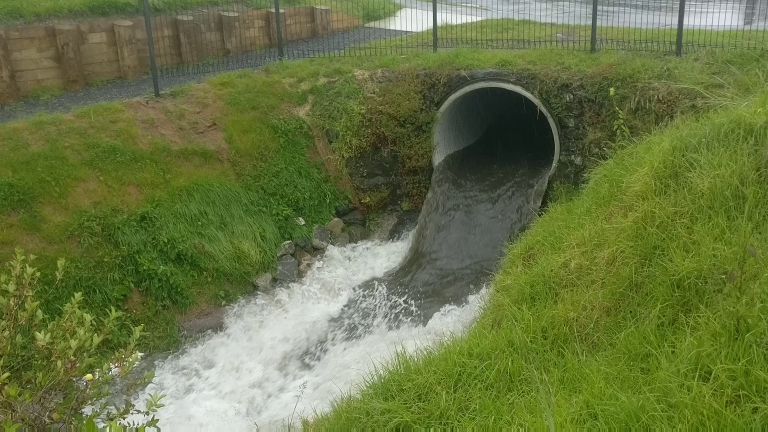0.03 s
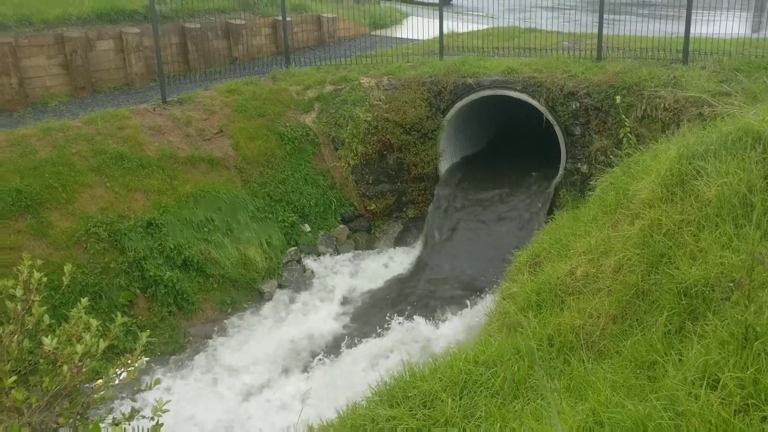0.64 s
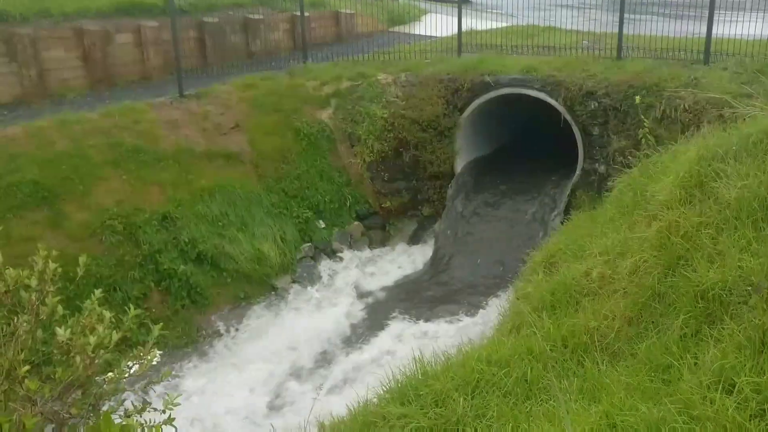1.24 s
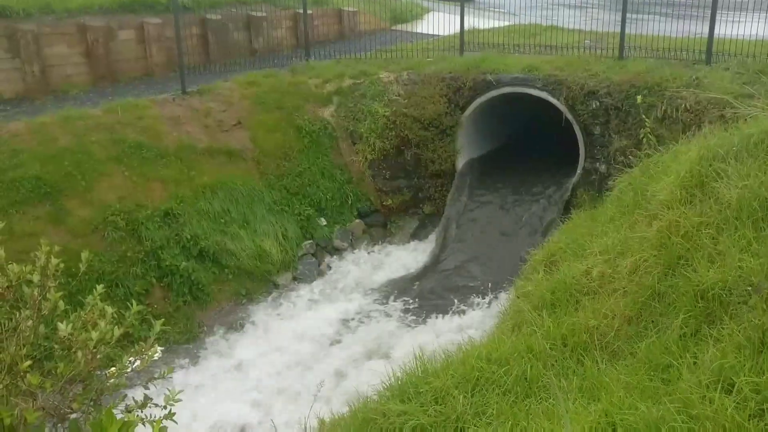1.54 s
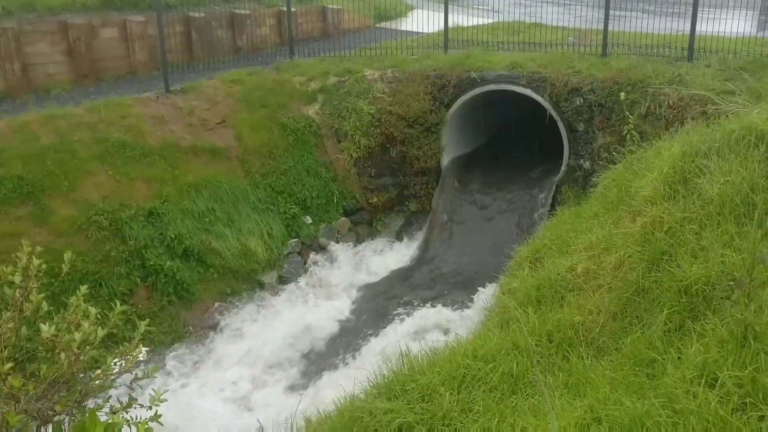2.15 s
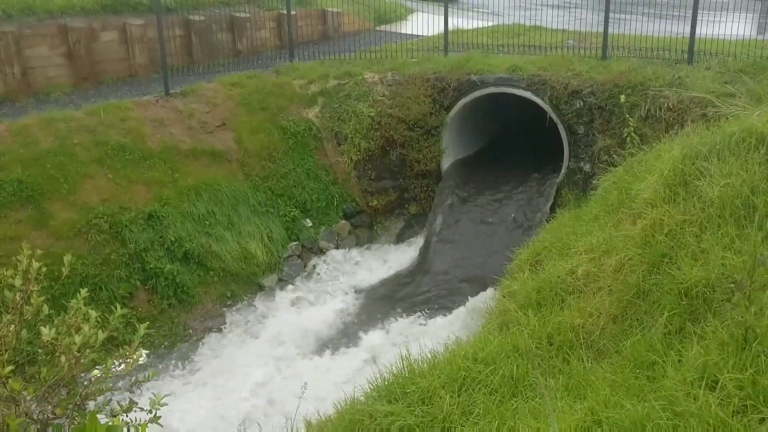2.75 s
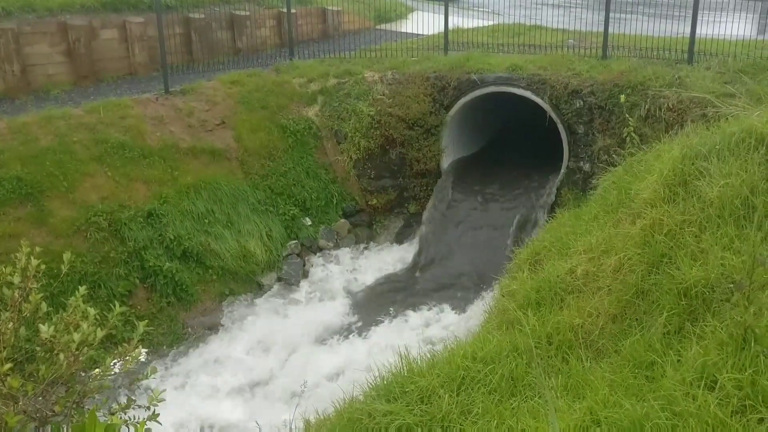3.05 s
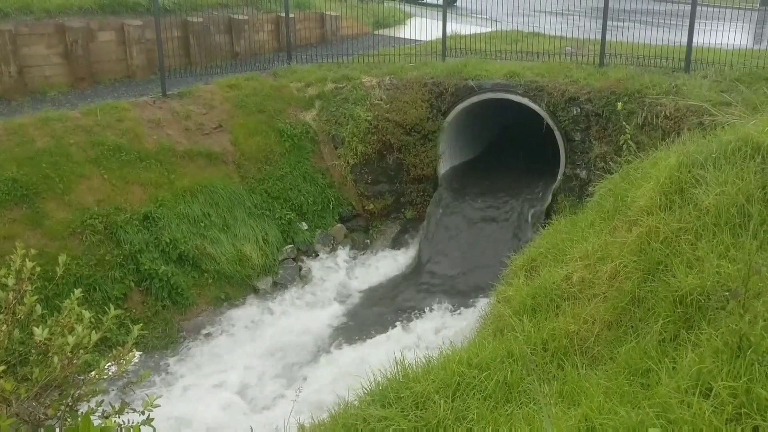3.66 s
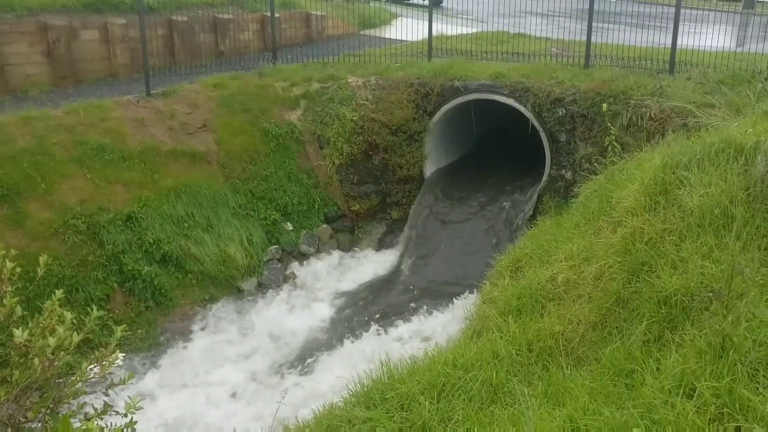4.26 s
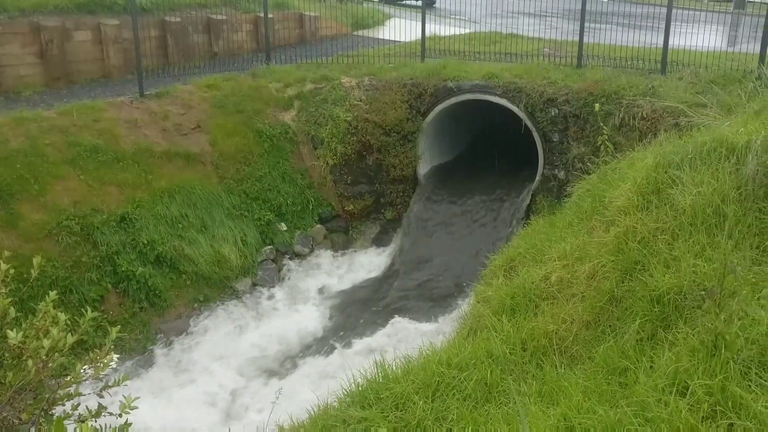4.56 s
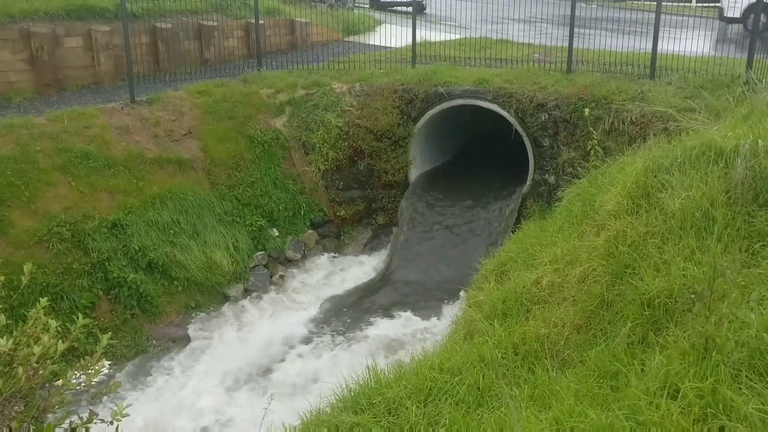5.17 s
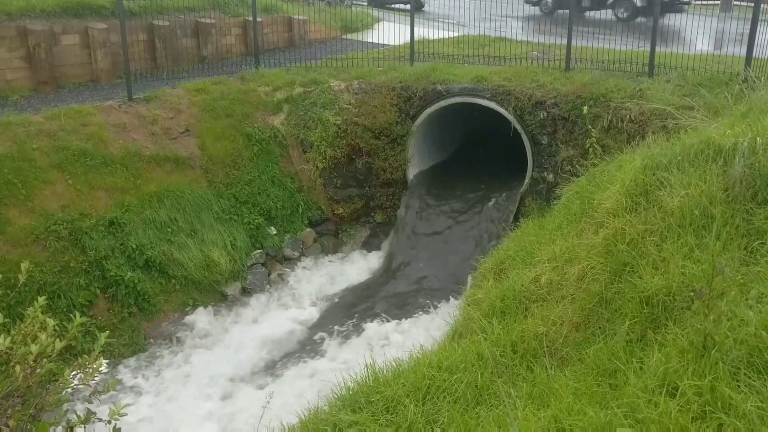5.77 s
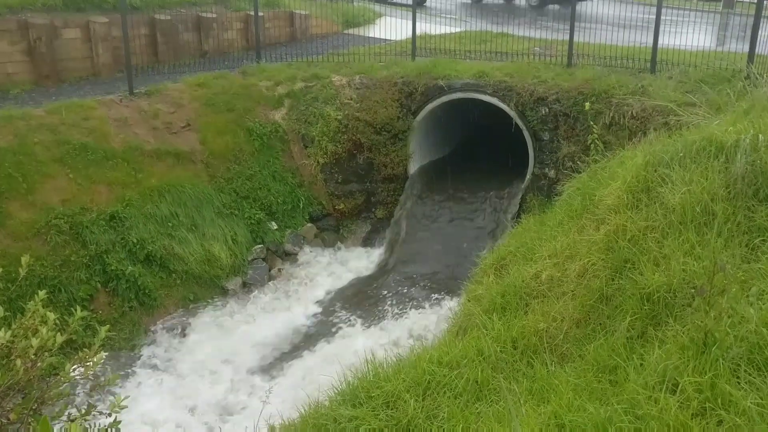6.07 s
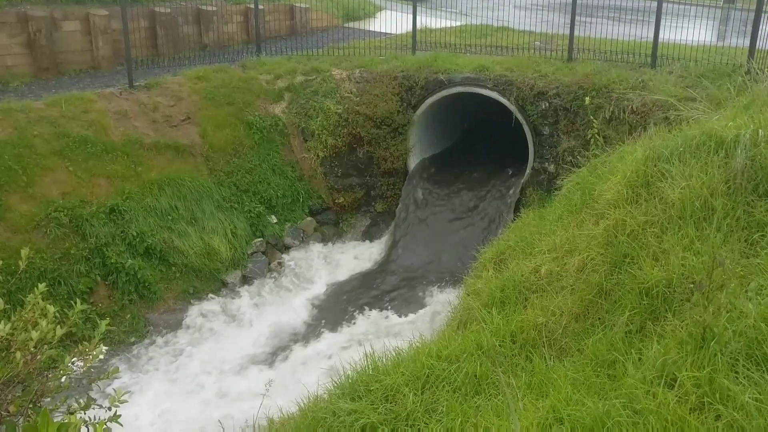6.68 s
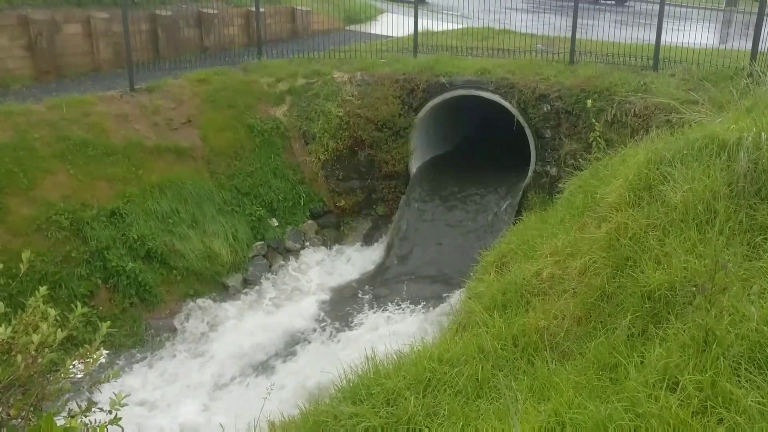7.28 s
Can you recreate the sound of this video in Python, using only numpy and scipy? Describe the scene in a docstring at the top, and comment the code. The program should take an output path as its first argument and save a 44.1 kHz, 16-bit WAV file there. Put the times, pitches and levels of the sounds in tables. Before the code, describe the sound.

After a quick fade-in, storm water rushes from a concrete pipe into a foaming channel outdoors and continues for the whole seven and a half seconds. Foam, small splashes and bubbles merge into one dense, wide rush, with fine spray hissing on top and a steady low rumble underneath. The water starts slightly to the right, swelling a little and settling in the centre by 3 seconds. From about 3.5 seconds, a distant vehicle pulls away with a low exhaust hum that rises gently in pitch and drops out just after 5 seconds. A faint swish of tyres on a wet road follows, peaking near 6 seconds behind the water. Very brief air pops touch the microphone on the left at about 1.4, 1.9 and 4.2 seconds, and tiny dry droplet ticks land on the right at about 0.3, 1.7 and 6.4 seconds.

```python
"""At the mouth of a concrete culvert, storm water shoots into a foaming channel between grass banks.
The white water rushes with collapsing foam, splashes and ringing bubbles; spray hisses above it,
and air trapped by the plunging jet rumbles below. Behind, a vehicle pulls away on the wet road with
a low exhaust note and a swish of tyres. Puffs of air and droplets touch the microphone's two ports."""
import sys
import numpy as np
from scipy import signal
from scipy.fft import rfft, irfft
from scipy.io import wavfile
from scipy.ndimage import uniform_filter1d

SR = 44100
rng = np.random.default_rng(int(sys.argv[2]) if len(sys.argv) > 2 else 0)


def materialize(psi):
    """Save the field psi as 16-bit PCM at rate SR to the path in sys.argv[1].

    A 1-D psi becomes a single channel; in a 2-D psi each row is a channel.
    """
    bounded = np.clip(np.atleast_2d(psi).T, -1, 1)
    quanta = np.round(bounded * 32767).astype(np.int16)
    wavfile.write(sys.argv[1], SR, quanta)


N = 322812
TIME = np.arange(N) / SR
BIN_HZ = np.maximum(np.fft.rfftfreq(N, 1 / SR), 1)


# The flow swells, then holds. Each row: time in seconds, relative levels of rush and spray in dB.
FLOW_LEVELS = [(0.4, -29, -33.5), (1.3, -27, -32), (1.5, -25.8, -30), (1.75, -26, -30), (2.55, -25, -29.5),
               (2.75, -25.6, -28.5), (2.9, -24, -28.5), (3.12, -25.5, -29), (3.65, -24.5, -27.7),
               (4.25, -24.5, -28.5), (5.5, -25, -29), (5.85, -24.5, -29), (6.25, -24, -29.5),
               (6.75, -25.5, -29.5), (7.1, -24.5, -29)]
# Spectrum of white water. Each row: frequency in Hz, relative spectral density in dB.
RUSH_SPECTRUM = [(150, -14), (320, -10), (470, -8), (640, -0.2), (800, -1.9), (960, -1.2), (1180, -2.5),
                 (1600, -0.5), (2500, -2.5), (3400, -5.5), (4600, -6.5), (5600, -8), (6700, -12),
                 (8300, -16.5), (9700, -13.5), (14800, -11)]
# The water starts louder on the right, then settles in the centre.
# Each row: time in seconds, added level of left over right in dB.
BALANCE_DRIFT = [(0.1, -3), (1.5, -2), (2.3, -1), (3.0, 0), (4.1, 0), (5.0, 0), (7.3, .5)]

def white_water():
    """Incoherent addition: foam, splashes and bubbles sum to a rush, with fine spray hissing on top."""
    rush_db, spray_db = in_time(FLOW_LEVELS)
    balance_db, = in_time(BALANCE_DRIFT)
    water = foam(surge_db=0.23, slosh_db=0.58, patchy_db=0.84)
    water += from_db(-11.5) * splashes(per_s=220, spread_db=0.9, t60_s=0.018)
    water += from_db(-17) * bubbles(low_hz=703, high_hz=6200, cycles=27, rise=0.09,
                                    spread_db=1.0, count=5000)
    water = coloured(evened(water, seconds=0.17), RUSH_SPECTRUM)
    mist = foam(surge_db=0.18, slosh_db=0.65, patchy_db=0.58)
    mist = coloured(evened(mist, seconds=0.2), RUSH_SPECTRUM)
    rush = from_db(rush_db + 5) * (water - treble(water))
    spray = from_db(spray_db + 11.5) * treble(mist)
    return at_ports(rush + spray) * from_db(balance_db * np.array([[.5], [-.5]]))


def foam(surge_db, slosh_db, patchy_db):
    """Amplitude modulation: the noise of countless tiny collapses surges and flickers by octaves."""
    white = rfft(rng.standard_normal((2, N)))
    common_db = surge_db * drift(10) + slosh_db * drift(26)
    bin_octave = np.clip(np.log2(BIN_HZ), 8, 13)
    noise = 0
    for octave in range(13, 7, -1):  # 8192 Hz down to 256 Hz
        share = np.clip(1 - np.abs(bin_octave - octave), 0, 1)
        noise += irfft(white * share, N) * from_db(common_db + patchy_db * drift(10))
    return unit_rms(noise)


def splashes(per_s, spread_db, t60_s):
    """A Poisson process: thrown water lands at random, each slap a noise burst decaying exponentially."""
    lands = rng.random((2, N)) < per_s / SR
    impacts = np.zeros((2, N))
    impacts[lands] = from_db(spread_db * np.minimum(rng.exponential(1, lands.sum()), 4))
    power_decay = from_db(-120 / (t60_s * SR))
    power = signal.lfilter([1], [1, -power_decay], impacts ** 2 + 1e-18)
    return unit_rms(np.sqrt(power) * rng.standard_normal((2, N)))


def bubbles(low_hz, high_hz, cycles, rise, spread_db, count):
    """Damped resonance: each bubble rings down by 60 dB, its pitch rising as it nears the surface."""
    ringing = np.zeros((2, N))
    for when, size, strength, place in rng.random((count, 4)):
        hz = low_hz * (high_hz / low_hz) ** size
        start, length = int(when * N), int(cycles / hz * SR)
        age = np.arange(min(length, N - start)) / length  # fraction of the bubble's life
        envelope = from_db(-spread_db * np.log(max(strength, .02)) - 60 * age)
        note = np.sqrt(hz) * envelope * np.sin(2 * np.pi * cycles * age * (1 + rise * age))
        pan = [np.cos(2 * np.pi * place), np.sin(2 * np.pi * place)]
        ringing[:, start:start + len(age)] += np.outer(pan, note)
    return unit_rms(ringing)


# Spectrum of the plunge. Each row: frequency in Hz, relative spectral density in dB.
RUMBLE_SPECTRUM = [(20, -35), (36, -38), (50, -9.5), (68, -5.5), (92, -5), (115, -0.5), (138, -4.5),
                   (165, -3), (220, -5.5), (275, -10.5), (340, -19.5), (480, -42), (1000, -43)]
# The jet comes down harder and softer. Each row: time in seconds, rumble level in dB.
JET_HEAVE = [(0.4, -26), (0.85, -25), (1.1, -27), (1.45, -25.5), (2.3, -25.5), (2.75, -25.5), (3.35, -24.5),
             (4.05, -24), (4.7, -25.5), (5.5, -25), (6.1, -24.5), (7.3, -24.2)]

def plunge():
    """Air entrainment: the jet drives pockets of air under water, which throb inside a dense rumble."""
    rumble_db, = in_time(JET_HEAVE)
    churn = coloured(rng.standard_normal((2, N)), RUMBLE_SPECTRUM)
    pockets = bubbles(low_hz=54.7, high_hz=315, cycles=11.4, rise=0.055, spread_db=0.8, count=900)
    rumble = churn + from_db(-6) * coloured(pockets, RUMBLE_SPECTRUM)
    return at_ports(from_db(rumble_db) * evened(rumble, seconds=.11))


# The vehicle speeds up. Each row: time in seconds, firing rate in Hz, level in dB.
ENGINE_RUN = [(3.4, 72, -44), (3.85, 76, -30), (4.1, 78.5, -25.5), (4.3, 78.5, -29), (4.45, 79, -25),
              (4.7, 83.5, -25), (4.97, 88.5, -23.8), (5.08, 90, -33), (5.3, 84, -55)]
# The exhaust note. Each row: multiple of the firing rate, relative level in dB.
EXHAUST_HARMONICS = [(1, -5), (2, 0), (3, -21), (4, -19), (6, -27)]

def exhaust():
    """A harmonic series: a distant engine's slightly unsteady firing sets the fundamental."""
    firing_hz, level_db = in_time(ENGINE_RUN)
    phase = 2 * np.pi * np.cumsum(firing_hz * (1 + 0.0011 * drift(11))) / SR
    note = sum(from_db(db) * np.sin(k * phase + 2 * np.pi * rng.random()) for k, db in EXHAUST_HARMONICS)
    return from_db(level_db) * note


# Spectrum of tyres on a wet road. Each row: frequency in Hz, relative spectral density in dB.
TYRE_SPECTRUM = [(300, -23), (1000, -8), (1600, 2), (2400, -6), (6000, -33)]

def tyres(nearest_s=5.93, half_width_s=0.47, level_db=-33):
    """Attenuation with distance: the swish peaks as the vehicle passes nearest, behind the pipe."""
    swish = coloured(rng.standard_normal((2, N)), TYRE_SPECTRUM)
    attenuation = 1 + ((TIME - nearest_s) / half_width_s) ** 2
    return at_ports(from_db(level_db) * swish / attenuation)


# Puffs of air. Each row: time in seconds, peak in dB, pitch in Hz, half-width in seconds.
AIR_PUFFS = [(1.3533, -3.5, 1100, .00022), (1.365, -13.5, 58, .014), (1.9496, -5, 1900, .0003),
             (1.9504, -6, 700, .0005), (4.2219, -0.6, 840, .00062)]

def puffs():
    """Pressure pulses: air pops on the left port, each puff a tone under a brief Gaussian envelope."""
    left = np.zeros(N)
    for centre_s, db, hz, half_width_s in AIR_PUFFS:
        offset = TIME - centre_s
        left -= from_db(db) * np.cos(2 * np.pi * hz * offset) * np.exp(-(offset / half_width_s) ** 2)
    return np.array([left, np.zeros(N)])


# Droplets. Each row: start in seconds, peak in dB, pitch in Hz, the port's ring over that pitch in dB.
DROPLET_HITS = [(0.2786, -10, 6300, 10), (1.7035, -1.8, 6300, -3), (6.4307, -8, 3400, -20)]

def droplets(port_ring_hz=12500, t60_s=.0026):
    """Impulse response: a droplet on the right port excites two heavily damped modes, a dry tick."""
    right = np.zeros(N)
    for start_s, db, hz, ring_db in DROPLET_HITS:
        age = np.clip(TIME - start_s, 0, 2 * t60_s)
        modes = np.sin(2 * np.pi * hz * age) + from_db(ring_db) * np.sin(2 * np.pi * port_ring_hz * age)
        tick = modes * from_db(-60 * age / t60_s)
        right += from_db(db) * tick / np.abs(tick).max()
    return np.array([np.zeros(N), right])


# Likeness of the two ports. Each row: frequency in Hz, correlation from 0 to 1.
PORT_CORRELATION = [(30, .78), (80, .97), (250, .96), (480, .66), (700, .82), (1050, .72), (1500, .35),
                    (2200, .15), (3500, 0)]
# Narrow bands where left and right sound more alike or more opposed.
# Each row: centre in Hz, half-width in Hz, added correlation (negative if opposed).
CORRELATION_RIPPLE = [(2520, 100, -.3), (2850, 90, .25), (4350, 80, .3), (5030, 110, -.55), (5350, 70, .35),
                      (5630, 80, -.35), (5900, 110, .3), (6200, 70, -.3), (6560, 80, .35), (6760, 90, -.55),
                      (7100, 90, .45), (7400, 70, -.5)]
# Balance of the ports. Each row: frequency in Hz, level of left over right in dB.
LEFT_OVER_RIGHT = [(100, 0.2), (280, -1.4), (500, 3.8), (900, -0.8), (1300, 4.2), (2300, 2.5), (3300, 7.5),
                   (4700, 0.4), (6700, 1.1), (8500, 8.6), (11000, 14.2), (12500, 11), (14500, 4)]
# Phase between the ports. Each row: frequency in Hz, lead of the left in radians.
LEFT_LEAD = [(120, .04), (250, .25), (440, 1.05), (600, .45), (850, 1.1), (1100, 2.1), (1600, 1.3),
             (2400, 2.7), (3000, 2 * np.pi)]

def at_ports(wide):
    """Partial coherence: a wide source reaches the ports alike in the bass, mostly unrelated above."""
    ripple = sum(peak * np.exp(-((BIN_HZ - hz) / width) ** 2) for hz, width, peak in CORRELATION_RIPPLE)
    correlation = np.clip(at_bins(PORT_CORRELATION) + ripple, -.98, .98)
    mid, side = rfft(wide) * np.sqrt([(1 + correlation) / 2, (1 - correlation) / 2])
    balance = from_db(at_bins(LEFT_OVER_RIGHT))
    left = (mid + side) * balance
    right = (mid - side) * np.exp(-1j * at_bins(LEFT_LEAD))
    equal_power = np.sqrt(2 / (1 + balance ** 2))
    return irfft(np.array([left, right]) * equal_power, N)


def from_db(db):
    """Decibels to amplitude ratio."""
    return 10 ** (np.asarray(db) / 20)


def unit_rms(x):
    """Normalisation to unit power."""
    return x / np.sqrt(np.mean(x ** 2) + 1e-20)


def evened(x, seconds):
    """Running normalisation: power holds steady over spans longer than the given time."""
    return x / np.sqrt(uniform_filter1d(x ** 2, int(seconds * SR)) + 1e-12)


def in_time(rows):
    """Linear interpolation of each column at every sample."""
    times, *columns = np.transpose(rows)
    return [np.interp(TIME, times, column) for column in columns]


def at_bins(rows):
    """Interpolation in log frequency at every bin."""
    hz, values = np.transpose(rows)
    return np.interp(np.log(BIN_HZ), np.log(hz), values)


def coloured(x, spectrum):
    """Spectral shaping, at unit power."""
    return unit_rms(irfft(rfft(x) * from_db(at_bins(spectrum)), N))


def treble(x):
    """High-pass filtering at 7.5 kHz."""
    return irfft(rfft(x) / (1 + (7500 / BIN_HZ) ** 8), N)


def drift(rate_hz):
    """Low-pass noise: a random wander of unit spread, changing about rate_hz times a second."""
    hop, settle = 40, 2000
    pole = np.exp(-2 * np.pi * rate_hz * hop / SR)
    white = rng.standard_normal(N // hop + settle + 2)
    slow = signal.lfilter([1], [1, -2 * pole, pole * pole], white)[settle:]
    return np.interp(np.arange(N) / hop, np.arange(len(slow)), unit_rms(slow))


def scene():
    """Superposition: water in front, the road behind, small touches on the microphone."""
    return white_water() + plunge() + exhaust() + tyres() + puffs() + droplets()


def ramp(start_s, length_s):
    """A linear rise from 0 to 1."""
    return np.clip((TIME - start_s) / length_s, 0, 1)


def record(dry, open_s=.092, opening_db=-14, bass_cut_hz=210, cutoff_hz=15700):
    """Gain and band limiting: the microphone fades up, bass last; peaks clip and the top is cut."""
    thin = signal.sosfilt(signal.butter(2, bass_cut_hz, "high", fs=SR, output="sos"), dry)
    filled = thin + (dry - thin) * ramp(start_s=0.36, length_s=0.017)
    fade = from_db(opening_db) + (1 - from_db(opening_db)) * ramp(open_s, length_s=0.26)
    opened = filled * fade * ramp(open_s, length_s=.004)
    steep_lowpass = signal.ellip(14, .1, 90, cutoff_hz, fs=SR, output="sos")
    return signal.sosfilt(steep_lowpass, np.clip(opened, -.87, .87))


dry = scene()
out = record(dry)
materialize(out)
```